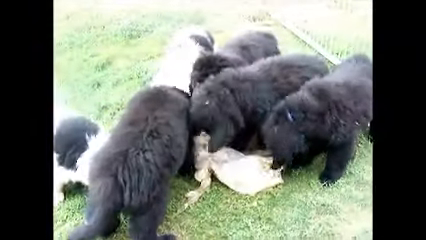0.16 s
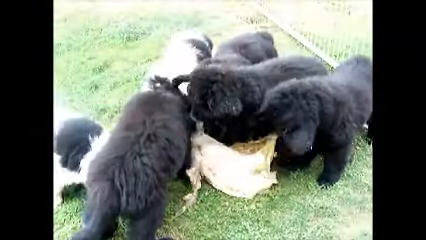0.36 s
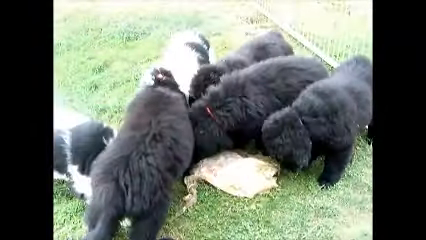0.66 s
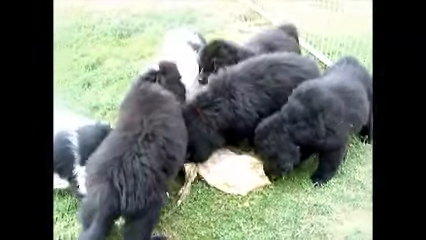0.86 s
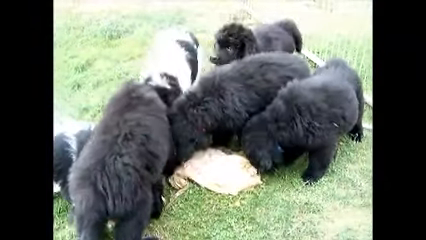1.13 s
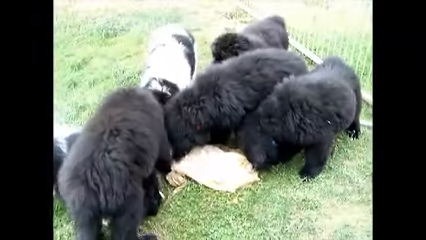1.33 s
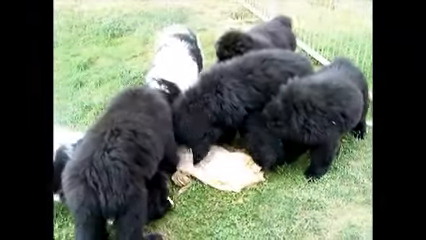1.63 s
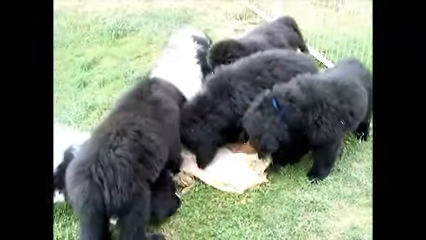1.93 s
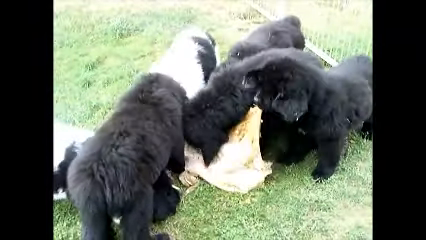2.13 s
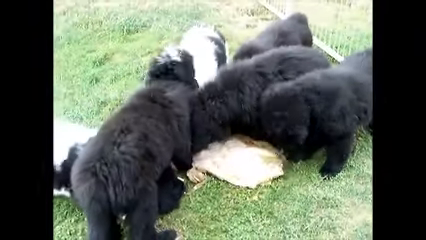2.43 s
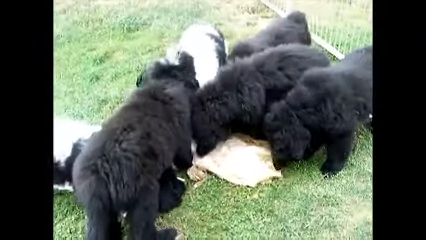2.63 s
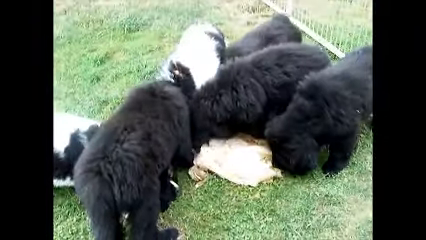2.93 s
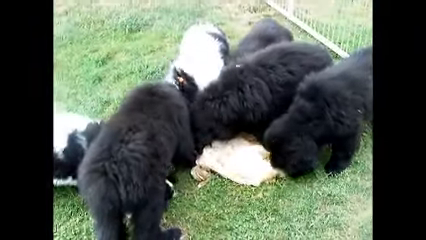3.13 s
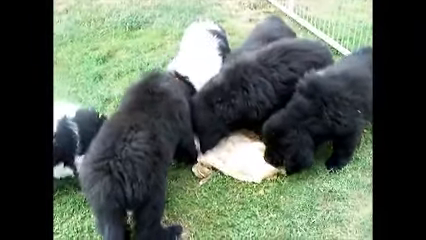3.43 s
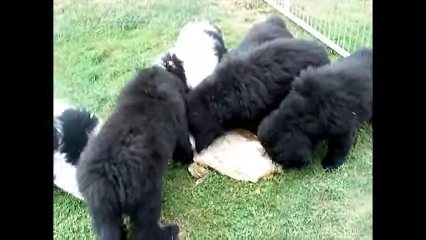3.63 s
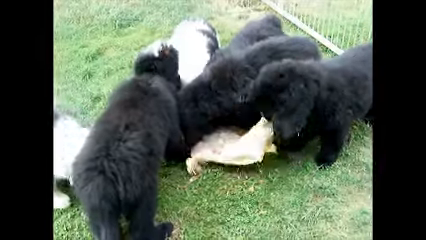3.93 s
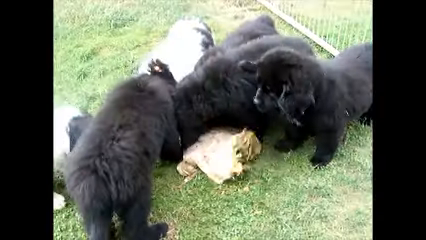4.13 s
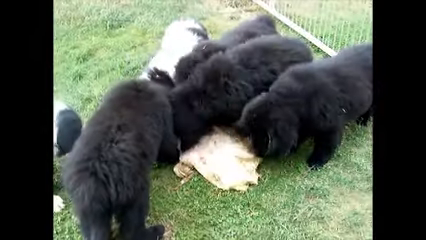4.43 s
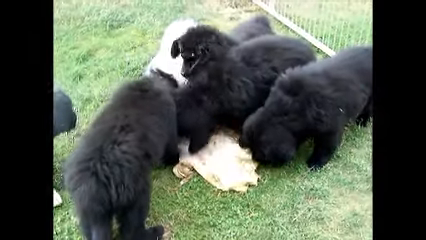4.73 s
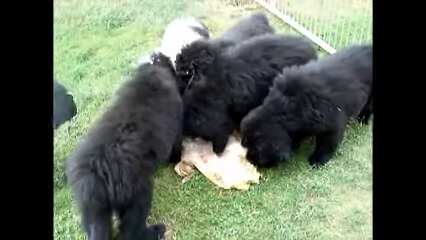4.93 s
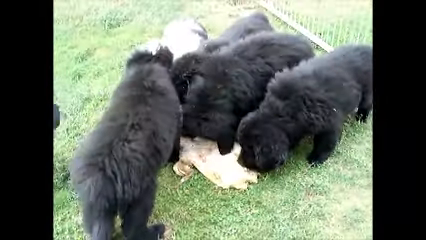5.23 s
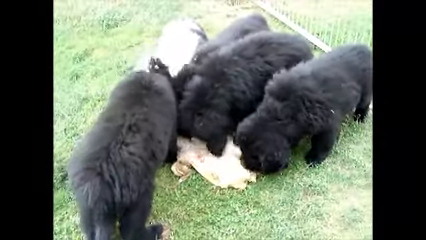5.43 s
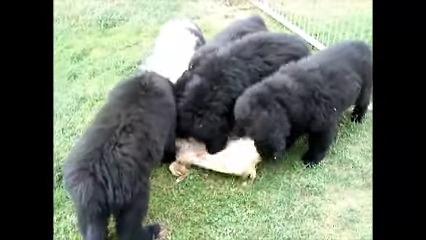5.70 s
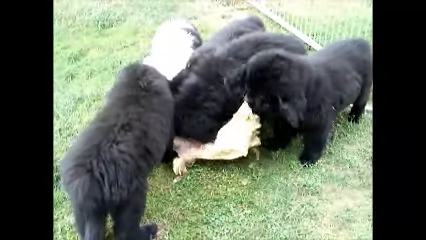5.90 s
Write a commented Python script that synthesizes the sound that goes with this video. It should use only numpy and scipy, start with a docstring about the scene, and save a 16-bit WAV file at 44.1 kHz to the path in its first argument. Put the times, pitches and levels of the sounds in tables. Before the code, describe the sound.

Close wet mouth clicks and tearing from several feeding puppies outdoors, soft thuds on turf, small birds chirping behind, faint low motor drone.

```python
"""Wet smacks come first: puppies chew and tug at raw tripe on a lawn, over fine crackle, tearing and soft thuds.
Mouths are short rings and splashes, crackle and tearing are crowds of tiny snaps, thuds are pushes of air.
Small birds whistle and chirp as gliding tones and rough trills, scattered by the garden's fence and walls.
Far off, a motor drones as wavering hums over a low rumble, and a thin tone comes and goes."""
import sys
import numpy as np
from scipy import signal
from scipy.fft import rfft, irfft, next_fast_len
from scipy.io import wavfile
from scipy.ndimage import map_coordinates

SR = 44100
rng = np.random.default_rng(int(sys.argv[2]) if len(sys.argv) > 2 else 0)


def materialize(psi):
    """Save the field psi as 16-bit PCM at rate SR to the path in sys.argv[1].

    A 1-D psi becomes a single channel; in a 2-D psi each row is a channel.
    """
    bounded = np.clip(np.atleast_2d(psi).T, -1, 1)
    quanta = np.round(bounded * 32767).astype(np.int16)
    wavfile.write(sys.argv[1], SR, quanta)


N = 267246  # length in samples


def amp(db):
    """Turn decibels into a gain."""
    return 10 ** (np.asarray(db) / 20)


def unit(x):
    """Scale a sound to an rms (average strength) of 1."""
    return x / np.sqrt(np.mean(x ** 2) + 1e-20)


def along(points, hz):
    """Read a curve of (Hz, value) points on a logarithmic frequency axis."""
    f, v = np.transpose(points)
    return np.interp(np.log(hz + 1), np.log(f), v)


def curves(rows):
    """Join timed rows by straight lines: one curve over the samples for each column after the time."""
    s, *columns = np.transpose(rows)
    time = np.arange(N) / SR
    return [np.interp(time, s, column) for column in columns]


def wobble(rate, size=N):
    """Draw a smooth random curve through `rate` random points a second."""
    knots = rng.standard_normal(int(size * rate / SR) + 4)
    return map_coordinates(knots, [np.arange(size) * rate / SR])


def filtered(x, response):
    """Shape the frequencies of x by a response, given as a function of Hz."""
    m = next_fast_len(N + SR // 4)
    return irfft(rfft(x, m) * response(np.fft.rfftfreq(m, 1 / SR)), m)[..., :N]


def add(track, s, x):
    """Mix x into a stereo track, starting at s seconds."""
    i = min(max(round(s * SR), 0), N)
    track[:, i:i + x.shape[-1]] += x[..., :N - i]


def panned(db):
    """Left and right gains for a level difference in dB; above zero leans left."""
    gains = amp([[db / 2], [-db / 2]])
    return unit(gains)


def tone(hz):
    """A sine of rms 1 whose pitch follows a curve in Hz."""
    return np.sqrt(2) * np.sin(2 * np.pi * np.cumsum(hz) / SR)


# How alike the left and right sides are. Each row: frequency in Hz, likeness from 0 to 1.
SIDE_LIKENESS = [(60, 0.74), (130, 0.62), (290, 0.59), (650, 0.63), (1440, 0.19), (3200, 0.063),
                 (7090, 0.036)]


def coloured(pair, spectrum):
    """Blend two unrelated signals into a stereo field of rms 1, with a spectrum in (Hz, dB) rows."""
    def mid_and_side(hz):
        turn = np.arccos(np.clip(along(SIDE_LIKENESS, hz), 0, 1)) / 2
        return amp(along(spectrum, hz)) * [np.cos(turn), np.sin(turn)]

    mid, side = filtered(pair, mid_and_side)
    return unit(np.array([mid + side, mid - side]))


def grains(rate, spread_db, smooth):
    """Tiny snaps of uneven size, `rate` a second on each side, mixed with `smooth` parts of steady hiss."""
    hits = rng.random((2, N)) < rate / SR
    size = amp(spread_db * np.minimum(rng.exponential(size=(2, N)), 4))
    snaps = unit(hits * size * rng.choice([-1, 1], (2, N)))
    return snaps + smooth * rng.standard_normal((2, N))


def ticks(rate, spread_db, centre_hz, octaves, ring):
    """Wet ticks at random moments, each ringing at its own pitch; most are tiny, a few stand out."""
    out, t = np.zeros((2, N)), np.arange(SR // 50) / SR
    for when, size, pitch, side in rng.random((round(rate * N / SR), 4)):
        hz = centre_hz * 2 ** (octaves * (pitch - .5))
        fade = amp(-60 * t / ring)  # falls 60 dB in `ring` seconds
        tick = np.sin(2 * np.pi * hz * t) * fade * (1 - np.exp(-t * hz))
        level_db = spread_db * min(-np.log(1 - size), 3)
        add(out, when * N / SR, panned(12 * (side - .5)) * amp(level_db) * tick)
    return out


def garden(x, t60, gap=0.0013):
    """Scattered echoes from fence, walls and hedge, different on each side, fading 60 dB in t60 seconds."""
    t = np.arange(SR // 4) / SR
    tail = rng.standard_normal((2, len(t))) * amp(-60 * t / t60) * (t > gap)
    return signal.fftconvolve(x, tail / np.linalg.norm(tail[0]), axes=1)[:, :N]


def off_wall(x):
    """The same sound 47 ms later, from a wall some metres away."""
    return np.pad(x, ((0, 0), (round(.047 * SR), 0)))[:, :N]


# The loudest wet smacks of lips and teeth. Each row: time in seconds, level in dB before a 2 dB lift,
# mouth resonance in Hz, amount of splash against the ring, left-right difference in dB.
MOUTH_SMACKS = [(0.043, -19, 3740, 0.31, -2), (0.0617, -5.5, 5180, 0.17, -2),
                (0.1934, -10.5, 4100, 0.23, -3), (0.1948, -7, 4300, 0.25, 1), (0.2212, -17, 4680, 0.28, -2),
                (0.2367, -15, 5300, .4, 2), (0.2425, -15, 4300, 0.37, -2), (0.268, -8, 5070, 0.71, 6),
                (0.325, -19, 3870, 0.26, 0), (0.341, -16, 4700, 0.78, -5), (0.3612, -9, 5240, 0.66, -2),
                (0.381, -19, 3520, 0.34, -2), (0.498, -18, 4730, 0.42, -10), (0.6594, -10, 4270, 0.57, 0.5),
                (0.703, -20, 3200, 0.28, -5), (0.7079, -12, 3360, 0.44, -0.5), (0.748, -25, 6060, 0.22, 0),
                (0.7797, -11.5, 5700, 0.48, -1), (0.918, -12, 3050, 0.54, 1),
                (1.3605, -22, 5480, 0.53, 5.5), (1.443, -22.5, 5860, 0.59, 6), (2.547, -30, 6170, 0.33, 0),
                (4.0877, -16, 5740, 0.39, 3), (1.9597, -19, 5830, 0.7, 12), (2.1047, -20, 6040, 0.41, -1),
                (2.37, -19, 3800, 1, 1), (2.921, -22, 4900, 0.28, -2), (3.087, -16.5, 5800, .4, -2),
                (3.2329, -12.5, 5080, 0.19, 1), (3.2903, -8.5, 3020, 0.76, -1),
                (3.304, -13.5, 3270, 0.77, 5), (3.47, -6.5, 4630, 0.66, -1), (3.616, -12, 5800, 0.49, 3),
                (3.655, -14, 5830, 0.25, 2), (3.999, -18.5, 3460, .3, -1), (4.1257, -15, 5420, 0.87, -6),
                (4.6293, -11, 5250, 0.25, -1), (4.827, -28, 3800, .7, -5), (4.9002, -18, 3380, 0.81, -4.5),
                (4.9454, -20, 3600, .3, 0), (5.0065, -17, 5800, .3, -13), (5.016, -14.5, 3270, 1, -4),
                (5.1873, -22, 5900, 0.58, 7.5), (5.257, -28, 3550, 0.38, 1), (5.5353, -20, 4130, 0.49, 0),
                (5.591, -11.5, 3000, .6, -2.5), (5.6012, -17, 3460, 0.57, -10),
                (5.8546, -20, 3620, .2, -4.5), (5.8724, -8, 5340, 0.91, -3.5),
                (5.891, -24, 3700, .5, -13.5), (5.9174, -15, 3580, 0.13, -7)]


def smacks(rise=0.00053, splash_t60=0.014):
    """A wet film parts: a brief ring of the mouth cavity with a splash of finer snaps."""
    out, t = np.zeros((2, N)), np.arange(SR // 30) / SR
    splash_tone = [(400, -29.0), (1500, -12.0), (3200, 4.5), (6000, 6.5), (8000, -7)]  # Hz, dB
    spray = coloured(rng.standard_normal((2, N)), splash_tone)
    pop = (t / rise) ** 2 * np.exp(2 - 2 * t / rise)  # swells and dies within a few milliseconds
    splash_shape = amp(-60 * t / splash_t60) * (1 - np.exp(-t / rise))
    for s, db, hz, splash, side_db in MOUTH_SMACKS:
        # the ring starts at a somewhat different point of its swing on each side
        phase = rng.uniform(0, 2 * np.pi) + rng.normal(0, 0.95, (2, 1))
        cavity = np.sin(2 * np.pi * hz * t + phase) * pop
        i = rng.integers(N - len(t))
        snaps = spray[:, i:i + len(t)] * splash_shape
        click = cavity + 1.35 * splash * snaps
        add(out, s + .0004, amp(db + 2.0) * panned(side_db) * click / np.abs(click).max())
    return out + amp(-12) * garden(out, t60=0.21)


def nibbles():
    """Small wet ticks from the mouths farther back."""
    return amp(-32) * ticks(rate=22, spread_db=3, centre_hz=4500, octaves=1.2, ring=0.007)


# How busily the mouths work. Each row: time in seconds, crackle level in dB.
CHEWING_LEVEL = [(0, -36), (.27, -33), (.46, -39), (1.0, -41), (1.55, -40), (1.92, -34), (2.02, -32),
                 (2.4, -36), (2.74, -39.5), (3.6, -35), (4.3, -32.5), (4.8, -39.5), (5.25, -38.5),
                 (5.45, -34.5), (5.9, -32.5)]
# The colour of the wet crackle. Each row: frequency in Hz, level in dB.
CRACKLE_TONE = [(880, -19), (1500, -11.5), (1900, -13.5), (2270, -10.5), (3130, -5), (4160, -5.5),
                (4930, 3.5), (5410, 0), (5830, 3), (7540, -15.5), (9800, -43.5), (16600, -120)]
# The colour of paws and fur in the grass. Each row: frequency in Hz, level in dB.
SHUFFLE_TONE = [(65, -34), (110, 0), (139, -1.5), (220, -2.5), (423, -8), (475, -6.5), (617, -10),
                (823, -7), (1030, -13), (1410, -15.5), (2030, -20), (2500, -16), (3250, -56.5),
                (5500, -120)]
SHUFFLE_DB = -43  # average shuffle setting, heard all the time
SHUFFLE_FOLLOWS = 0.095  # share of the mouths' effort, in dB, that the paws follow


def chewing():
    """Many mouths crackle unevenly while paws and fur shuffle in the grass."""
    crackle_db, = curves(CHEWING_LEVEL)
    shuffle_db = SHUFFLE_DB + SHUFFLE_FOLLOWS * (crackle_db - crackle_db.mean())
    crackle = coloured(grains(rate=1000, spread_db=5.0, smooth=1.22), CRACKLE_TONE)
    shuffle = coloured(grains(rate=300, spread_db=3.5, smooth=1.54), SHUFFLE_TONE)
    crackle = crackle * amp(crackle_db + 1.55 * wobble(25))
    shuffle = shuffle * amp(shuffle_db + 2.23 * wobble(14))
    return crackle + shuffle


# Tugs that tear the meat or drag it over grass.
# Each row: start in seconds, length in seconds, tearing level in dB, scrape level in dB.
MEAT_TUGS = [(0.201, 0.1, -30, -61), (0.288, 0.12, -31, -47), (0.66, 0.036, -36, -61),
             (2.286, 0.15, -38, -65), (3.849, 0.069, -32.5, -36), (4.049, 0.061, -33, -59),
             (4.313, 0.12, -39.5, -44), (4.898, 0.032, -29.5, -40), (5.645, 0.13, -46.5, -40.5)]
# The colour of tearing fibres. Each row: frequency in Hz, level in dB.
TEAR_TONE = [(1200, -22.5), (2300, -7), (3300, 2), (4500, -8.5), (5300, 3.5), (6200, -10), (7500, -22.5),
             (9800, -42.5)]
# The colour of meat scraping over grass. Each row: frequency in Hz, level in dB.
SCRAPE_TONE = [(200, -20), (500, -5.5), (900, -1), (1600, -0.5), (2600, 1), (5000, -30.5), (9000, -60)]


def tugs():
    """Bundles of fibres give way in fits: ringing snaps and fine crackle over a lower scrape."""
    out = np.zeros((2, N))
    fibres = coloured(grains(rate=800, spread_db=3.5, smooth=0.4), TEAR_TONE)
    snaps = unit(ticks(rate=260, spread_db=3, centre_hz=4400, octaves=.8, ring=.006))
    fits = unit(amp(2.4 * wobble(150)))
    tearing = unit(fibres + snaps) * fits
    scrape = coloured(grains(rate=1100, spread_db=-0.5, smooth=0.95), SCRAPE_TONE) * fits
    for s, length, tear_db, scrape_db in MEAT_TUGS:
        part = slice(round(s * SR), round((s + length) * SR))
        tug = amp(tear_db) * tearing[:, part] + amp(scrape_db) * scrape[:, part]
        add(out, s, tug * signal.windows.tukey(tug.shape[1], .55))
    return out


def resonated(x, modes, pitch):
    """Let x ring through a set of resonances, all shifted by the factor pitch."""
    f = np.fft.rfftfreq(x.shape[-1], 1 / SR) / pitch
    body = sum(amp(db) * 1j * f * width / (centre * centre - f * f + 1j * f * width)
               for centre, width, db in modes)
    return irfft(rfft(x) * body, x.shape[-1])


# Puppies snuffle with their noses in the meat. Each row: start in seconds, length in seconds,
# nose level in dB, nostril level in dB, pitch of the nose's resonances as a factor of their usual one.
NOSE_SNUFFLES = [(2.491, 0.09, -45.5, -48, .95), (2.918, 0.042, -37, -32.5, 1.02),
                 (2.955, 0.115, -37, -38.5, 1), (3.43, 0.108, -33, -29, 1),
                 (3.729, 0.098, -39.5, -45.5, 0.98)]
# The hollow of the snout. Each row: resonance in Hz, its width in Hz, its strength in dB.
SNOUT_RESONANCES = [(840, 134, 6.5), (1090, 86, -0.5), (1406, 80, 3.5), (1615, 120, 3), (2236, 87, -3),
                    (2750, 91, 4), (3200, 77, 0), (3840, 180, 4)]
# The nostrils. Each row: resonance in Hz, its width in Hz, its strength in dB.
NOSTRIL_RESONANCES = [(3670, 110, -5), (4320, 90, 4), (4720, 53, 8.5), (5100, 130, 6), (5560, 100, -15)]


def snuffles(bubbling=1.8, breath=.4):
    """Air sputters through a wet nose: tiny bursts ring the hollow of the snout and the nostrils."""
    out = np.zeros((2, N))
    bubbles = grains(rate=300, spread_db=3, smooth=0) * bubbling
    flow = unit(bubbles + rng.standard_normal((2, N))) * amp(2.5 * wobble(130))
    hiss = coloured(flow, CRACKLE_TONE)
    for s, length, nose_db, nostril_db, pitch in NOSE_SNUFFLES:
        part = slice(round(s * SR), round((s + length) * SR))
        both_sides = flow[:, part] + .5 * flow[::-1, part]
        nose = unit(resonated(both_sides, SNOUT_RESONANCES, pitch))
        nostrils = unit(resonated(flow[:, part], NOSTRIL_RESONANCES, pitch)) + breath * hiss[:, part]
        air = amp(nose_db) * nose + amp(nostril_db) * nostrils
        add(out, s, air * signal.windows.tukey(air.shape[1], .45))
    return out


def push(hz):
    """One quick swing of pressure, strongest somewhat below hz, with a peak of 1."""
    u = 2 * np.pi * hz * np.arange(SR // 8) / SR
    x = u * (1 - u / 2) * np.exp(-u)
    return x / x.max()


def puff(hz, t60, attack):
    """A burst of dull noise, about three octaves wide, with a peak of 1."""
    t = np.arange(SR // 8) / SR
    band = signal.butter(2, [hz / 3, hz * 2.3], "bandpass", fs=SR)
    x = signal.lfilter(*band, rng.standard_normal(len(t)))
    x = x * amp(-60 * t / t60) * (1 - np.exp(-t / attack))
    return x / np.abs(x).max()


# Paws and meat land on the turf.
# Each row: time in seconds, slap level in dB, slap's rough pitch in Hz, ground thump level in dB.
TURF_THUDS = [(0.659, -24.5, 386, -27), (2.087, -24, 1060, -57), (2.102, -15.5, 1510, -44),
              (2.341, -24.5, 1200, -41.5), (2.921, -33.5, 720, -38.5), (2.957, -36.5, 394, -30),
              (4.3354, -15.5, 1000, -34), (4.3543, -26, 820, -22.5), (4.556, -36, 504, -23),
              (4.58, -36, 404, -29.5), (5.01, -43.5, 450, -28.5)]
TURF_HZ, TURF_T60 = 201, 0.097  # the ground's dull answer: rough pitch, seconds its noise takes to fall 60 dB


def thuds(cycles=16, attack=0.00063, squelch=0.71):
    """Soft contacts: a push of air with a short squelch, longer when it is low, over a thump of the turf."""
    out = np.zeros((2, N))
    for s, slap_db, hz, thump_db in TURF_THUDS:
        slap = push(hz) + squelch * puff(hz, cycles / hz, attack)
        thump = push(TURF_HZ) + squelch * puff(TURF_HZ, TURF_T60, attack)
        add(out, s, amp(slap_db) * slap + amp(thump_db) * thump)
    return out


# A small bird's run of whistles; each drops quickly and holds.
# Each row: start in seconds, held pitch in Hz, level in dB before the note's swell.
WHISTLE_RUN = [(4.585, 5520, -34), (4.74, 5570, -31), (4.917, 5505, -26), (5.086, 5560, -26),
               (5.251, 5650, -23), (5.416, 5680, -20.5), (5.577, 5700, -27.5)]
WHISTLE_S, WHISTLE_DROP_HZ, WHISTLE_SETTLE_S = 0.078, 531, 0.016  # length, drop and time constant of the drop
WHISTLE_HOOK_HZ = 90  # each whistle turns up at its very end


def whistles(swell_db=8, waver_hz=24):
    """Clean notes from the left that swell as they settle, each trailed by the wall's echo."""
    out, t = np.zeros((2, N)), np.arange(round(WHISTLE_S * SR)) / SR
    u = t / t[-1]
    glide = WHISTLE_DROP_HZ * np.exp(-t / WHISTLE_SETTLE_S) + WHISTLE_HOOK_HZ * u ** 10
    shape = signal.windows.tukey(len(t), .25)
    for s, hz, db in WHISTLE_RUN:
        level_db = db + swell_db * (np.sqrt(u) - .7) + 1.8 * wobble(120, len(t))
        note = tone(hz + glide + waver_hz * wobble(164, len(t)))
        add(out, s, panned(6.6) * amp(level_db) * shape * note)
    return out + amp(-17) * off_wall(out) + amp(-13) * garden(out.mean(0)[None], t60=.35)


# One loud falling call close by. Each row: time in seconds, pitch in Hz, level in dB before the mix.
CALL_CURVE = [(5.912, 5700, -46), (5.926, 7550, -32), (5.936, 6750, -28), (5.945, 6350, -20),
              (5.957, 5820, -18), (5.96, 5950, -27), (5.964, 5950, -11.5), (5.972, 5900, -26),
              (5.979, 5600, -10), (5.987, 5350, -14), (5.991, 5300, -18), (6.001, 4900, -9),
              (6.006, 4600, -24), (6.014, 4200, -38), (6.05, 3100, -44)]
CALL_DB, CALL_ECHO_DB = 1, -5  # mix levels of the call itself and of its scattered echo


def near_call(second_voice=1.11, second_db=-11):
    """Both sides of the syrinx (a bird's voice box) sweep together in trembling surges; a wall repeats them."""
    hz, db = curves(CALL_CURVE)
    first = tone(hz + 110 * wobble(900))
    second = tone(second_voice * hz + 300 * wobble(1200))
    voices = first + amp(second_db) * second
    time = np.arange(N) / SR
    sounding = (time > CALL_CURVE[0][0]) & (time < CALL_CURVE[-1][0])
    call = (voices * amp(db + 2.2 * wobble(450)) * sounding)[None]
    wall = off_wall(call) + .6 * garden(off_wall(call), t60=.04)
    direct = amp(CALL_DB) * panned(-6) * call
    return direct + amp(-9.5) * panned(-5) * wall + amp(CALL_ECHO_DB) * garden(call, t60=.19)


def slur(length, start_hz, end_hz, bend, fade):
    """Pitch and loudness curves of one bird note that glides from start to end."""
    u = np.linspace(0, 1, round(length * SR))
    return end_hz + (start_hz - end_hz) * (1 - u) ** bend, signal.windows.tukey(len(u), fade)


def rasp(length, start_hz, end_hz, width_hz, trill_hz=115, rough=0.54):
    """One bird note made of a fast run of tiny, ragged downward sweeps."""
    hz, shape = slur(length, start_hz, end_hz, bend=0.9, fade=0.27)
    cycle = np.cumsum(trill_hz * (1 + 0.13 * wobble(80, len(hz)))) / SR % 1
    shake = np.cos(np.pi * cycle) + rough * wobble(900, len(hz))
    sweeps = tone(hz + width_hz * shake) * np.sin(np.pi * cycle)
    return shape * unit(sweeps * amp(1.5 * wobble(242, len(hz))))


# A bird on the left calls a high rasp, then a lower one.
# Each row: start in seconds, level in dB before the mix in chirps().
RASP_PAIRS = [(1.147, -33), (2.492, -33), (5.701, -34.5)]
HIGH_NOTE_HZ, HIGH_WIDTH_HZ = 6050, 430
LOW_NOTE_HZ, LOW_WIDTH_HZ, LOW_NOTE_DB = 5720, 140, -2.5  # level against the high note
RASP_S, NOTE_GAP_S = 0.07, 0.085  # note length, and time from first start to second


def two_note_calls():
    """Pairs of rasping notes, the second lower and a little softer."""
    out = np.zeros((2, N))
    for s, db in RASP_PAIRS:
        left = panned(3.6) * amp(db)
        high = rasp(RASP_S, HIGH_NOTE_HZ, HIGH_NOTE_HZ, HIGH_WIDTH_HZ)
        low = rasp(RASP_S, LOW_NOTE_HZ, LOW_NOTE_HZ, LOW_WIDTH_HZ)
        add(out, s, left * high)
        add(out, s + NOTE_GAP_S, left * amp(LOW_NOTE_DB) * low)
    return out


# The two voices of a harsh chirp. Each row: start pitch in Hz, end pitch in Hz, level in dB against each other.
CHIRP_VOICES = [(4650, 3200, 0), (5250, 4650, -1)]
HARSH_S, HARSH_FADE_DB, FLUTTER_HZ = 0.095, 12, 170  # length, loss from start to end, average beats a second


def harsh_chirp(scatter_hz=300, depth_db=6):
    """Two rough voices fall together, broken into quick, uneven beats of scattered pitch."""
    note = 0
    for start_hz, end_hz, db in CHIRP_VOICES:
        hz, shape = slur(HARSH_S, start_hz, end_hz, bend=1.1, fade=.4)
        size = len(hz)
        beat = 2 * np.pi * np.cumsum(FLUTTER_HZ * (1 + .4 * wobble(200, size))) / SR
        level_db = db + depth_db * np.cos(beat) + 2.5 * wobble(170, size)
        level_db = level_db - HARSH_FADE_DB * np.linspace(0, 1, size)
        note = note + amp(level_db) * shape * tone(hz + scatter_hz * wobble(1100, size))
    return unit(note)


# A bird slightly to the right chirps harshly.
# Each row: start in seconds, level in dB before the mix in chirps().
CHIRP_TIMES = [(1.782, -30), (4.146, -29), (5.317, -30)]


def harsh_chirps():
    """Place the two-voiced chirps, a touch to the right."""
    out = np.zeros((2, N))
    for s, db in CHIRP_TIMES:
        add(out, s, panned(-0.43) * amp(db) * harsh_chirp())
    return out


PICKUP_LEAD_S, PICKUP_S = 0.04, 0.034  # how far ahead of the whistle it starts, and its length
PICKUP_HZ, PICKUP_WIDTH_HZ = 5600, 400
PICKUP_DB, PICKUP_LEFT_DB = -29.5, 0  # level before the mix in chirps(), left-right difference


def pickup_rasps():
    """From the fourth whistle of the run on, a short rasp leads into each one."""
    out = np.zeros((2, N))
    for s, *_ in WHISTLE_RUN[3:]:
        note = rasp(PICKUP_S, PICKUP_HZ, PICKUP_HZ, PICKUP_WIDTH_HZ)
        add(out, s - PICKUP_LEAD_S, panned(PICKUP_LEFT_DB) * amp(PICKUP_DB) * note)
    return out


def chirps():
    """Three birds' rasping notes from the hedge; much of the sound arrives as echo."""
    notes = two_note_calls() + harsh_chirps() + pickup_rasps()
    return amp(-1.5) * notes + amp(-12) * off_wall(notes) + amp(-3) * garden(notes, t60=0.24)


# A distant songbird's slurred notes. Each row: start in seconds, length in seconds,
# start pitch in Hz, end pitch in Hz, level in dB before the mix.
SONG_NOTES = [(.115, .05, 3250, 2780, -45), (.15, .06, 2750, 3120, -44), (.515, .05, 2950, 2550, -50),
              (.55, .06, 2280, 2700, -49), (.575, .09, 3350, 3050, -47), (.8, .1, 2700, 2780, -45.5),
              (1.045, .08, 3650, 3100, -50), (1.305, .06, 2950, 3060, -49), (3.655, .09, 3980, 3840, -46),
              (3.76, .14, 3330, 3200, -44.5), (4.02, .1, 3020, 2900, -48), (4.36, .14, 3780, 3600, -45)]
SONG_DB = -2  # mix level of song and echo together


def far_song():
    """Faint fluted notes, blurred by distance: gliding tones under a stronger echo."""
    out = np.zeros((2, N))
    for s, length, start_hz, end_hz, db in SONG_NOTES:
        hz, shape = slur(length, start_hz, end_hz, bend=1.2, fade=.5)
        level_db = db + 1.5 * wobble(70, len(hz))
        add(out, s, panned(-2) * amp(level_db) * shape * tone(hz + 25 * wobble(150, len(hz))))
    return amp(SONG_DB) * (out + 1.56 * garden(out, t60=0.36))


def twitter(rate=34, db=-59, centre_hz=3450, swing=.13):
    """A chorus of birds farther off: short overlapping glides lost in their echoes."""
    out = np.zeros((2, N))
    for when, pitch, glide, size in rng.random((round(rate * N / SR), 4)):
        start_hz = centre_hz * 2 ** (.65 * (pitch - .5))
        end_hz = start_hz * (1 + swing * (2 * glide - 1.2))
        hz, shape = slur(0.06, start_hz, end_hz, bend=1, fade=0.45)
        note = shape * tone(hz + 90 * wobble(200, len(hz)))
        add(out, when * N / SR, amp(db + 7 * size) * panned(-5) * note)
    return .5 * out + garden(out, t60=0.07)


# The motor's two hums over time.
# Each row: time in seconds, low hum in dB, high hum in dB, both before a 2.5 dB cut.
HUM_LEVELS = [(0, -41, -44), (1.0, -38, -41.5), (2.0, -41.5, -35), (3.0, -40.5, -43), (4.7, -39.5, -51),
              (6.06, -55.5, -52.5)]
# The average pitches of the low and the high hum, in Hz.
HUM_PITCHES = [54.2, 84.9]
# The motor's thin upper tones. Each row: average pitch in Hz, level in dB.
WHINE_TONES = [(218, -57), (830, -62.5)]
# The colour of the outdoor rumble. Each row: frequency in Hz, level in dB.
RUMBLE_TONE = [(12, -36), (20, -8.5), (70, 1), (100, -2.5), (160, -19.5), (210, -35), (350, -120)]


def motor():
    """A distant drone: two slowly wavering hums and thin upper tones over outdoor rumble."""
    hums = sum(amp(db - 2.5 + 1.4 * wobble(6.4)) * tone(hz + 1.224 * wobble(6))
               for hz, db in zip(HUM_PITCHES, curves(HUM_LEVELS)))
    whine = sum(amp(db + 4 * wobble(14)) * tone(hz * (1 + .012 * wobble(40)))
                for hz, db in WHINE_TONES)
    rumble = coloured(rng.standard_normal((2, N)), RUMBLE_TONE)
    return hums + whine + amp(-41.5) * rumble


# A faint tone comes and goes far off. Each row: start in seconds, length in seconds, level in dB.
FAR_TONE_TIMES = [(0.09, .17, -54), (0.3, .17, -55), (0.66, .1, -55), (1.0, .26, -57), (1.38, .12, -56),
                  (1.56, .14, -56), (3.3, .42, -56)]
FAR_TONE_HZ = 1387  # average pitch


def far_tone():
    """A thin, unsteady sine that fades in and out in the distance."""
    out = np.zeros((2, N))
    for s, length, db in FAR_TONE_TIMES:
        hz, shape = slur(length, FAR_TONE_HZ, FAR_TONE_HZ, bend=1, fade=.5)
        level_db = db + 3 * wobble(25, len(hz))
        add(out, s, amp(level_db) * shape * tone(hz + 22 * wobble(70, len(hz))))
    return out


def scene():
    """The puppies in front, birds, motor and far tone around them."""
    puppies = smacks() + nibbles() + chewing() + tugs() + snuffles() + thuds()
    birds = whistles() + near_call() + chirps() + far_song() + twitter()
    return puppies + birds + motor() + far_tone()


# The two microphones differ in tone. Each row: frequency in Hz, left-right difference in dB.
MICROPHONE_BALANCE = [(60, 0.5), (79, 3.5), (110, -0.5), (140, -3), (180, 9.5), (240, -4), (320, 6.5),
                      (430, 0.5), (570, 2.5), (750, 2.5), (990, 1.5), (1320, 5.5), (1740, -0.5), (2310, -2),
                      (3050, -3.5), (4040, -5.5), (5350, 5), (7090, 7)]
LEAD_S = 0.00004  # seconds by which the left microphone hears the scene first
TOP_HZ = 7700  # almost nothing passes above this


def record(dry):
    """Two closely spaced, slightly unlike microphones, then a very steep cut of the highest treble."""
    sides = np.array([[1], [-1]])

    def microphones(hz):
        lead = np.exp(1j * np.pi * hz * LEAD_S * sides)  # half the lead on each side
        return lead * amp(sides * along(MICROPHONE_BALANCE, hz) / 2)

    pair = filtered(dry, microphones)
    return filtered(pair, lambda hz: 1 / np.sqrt(1 + (hz / TOP_HZ) ** 70))


dry = scene()
out = record(dry)
materialize(out)
```